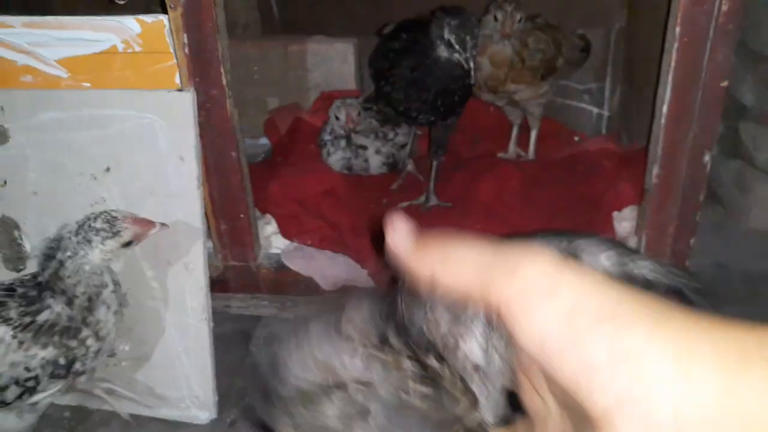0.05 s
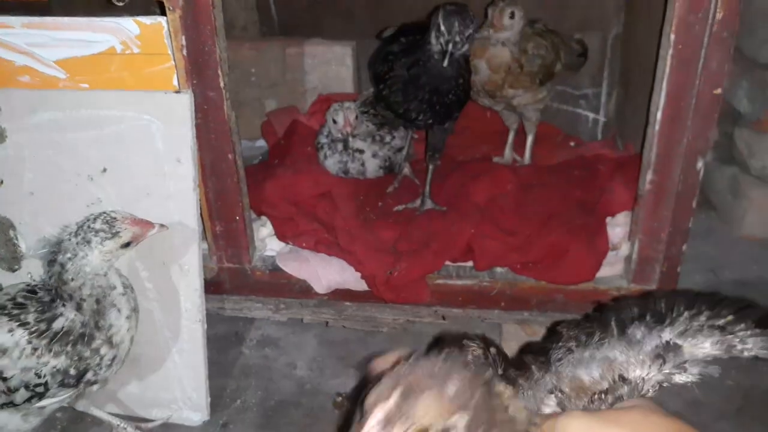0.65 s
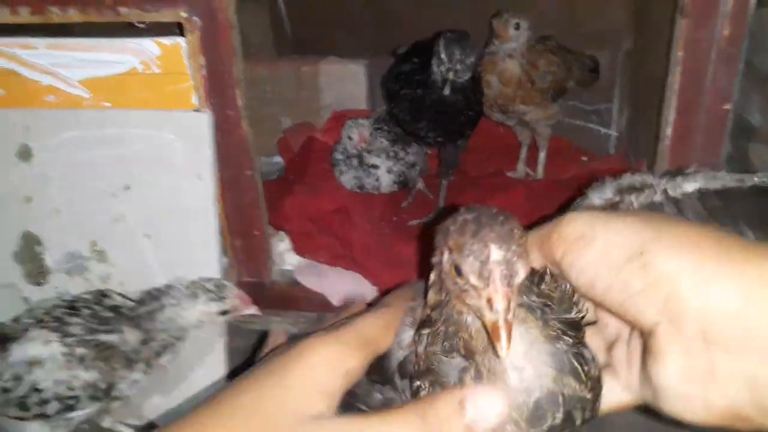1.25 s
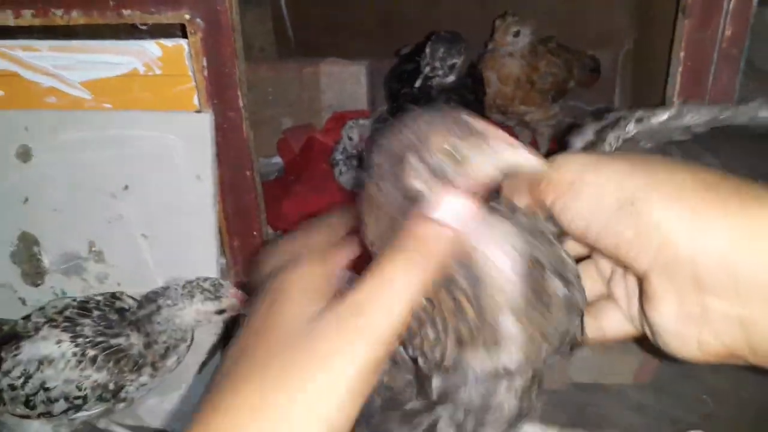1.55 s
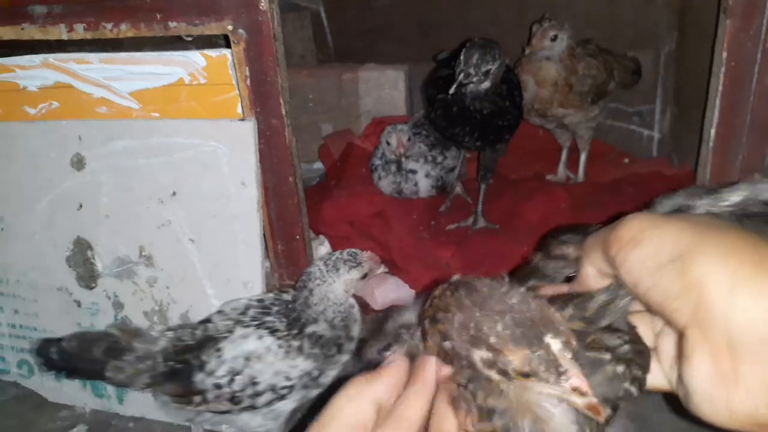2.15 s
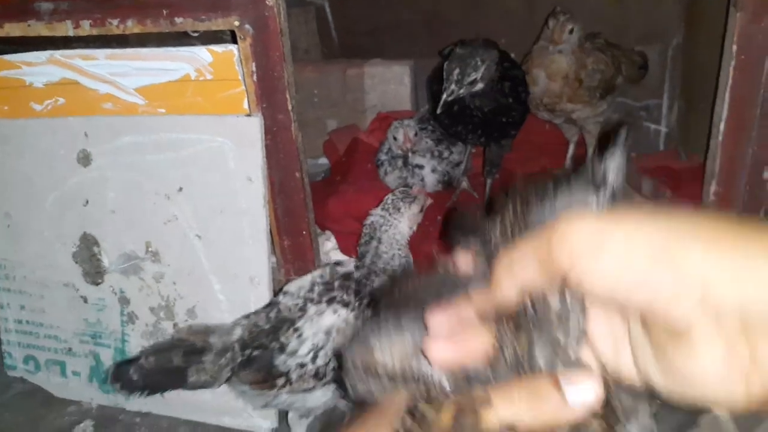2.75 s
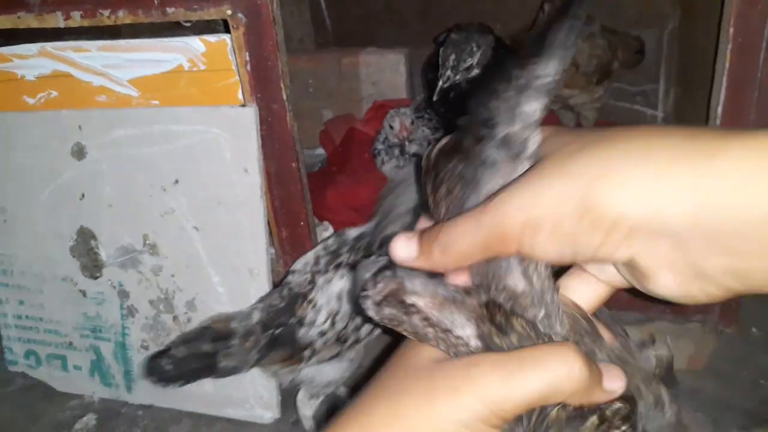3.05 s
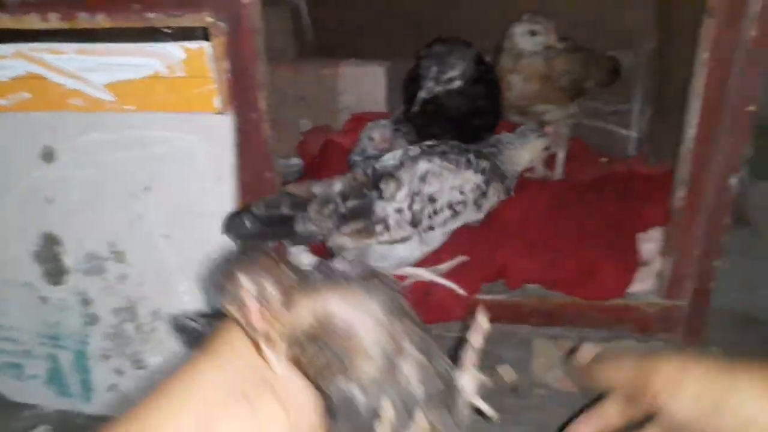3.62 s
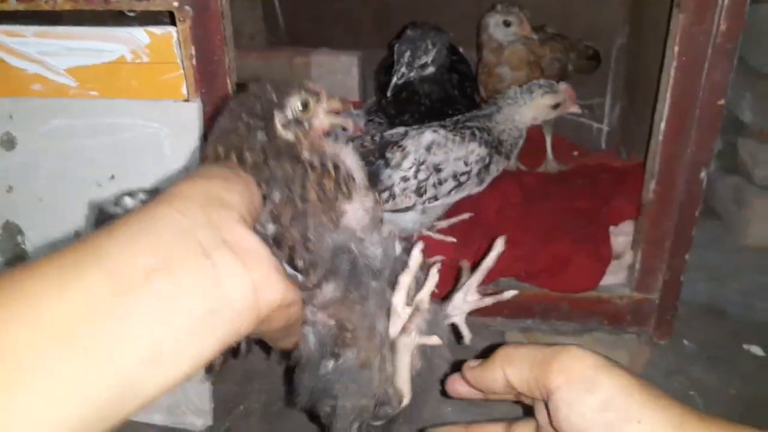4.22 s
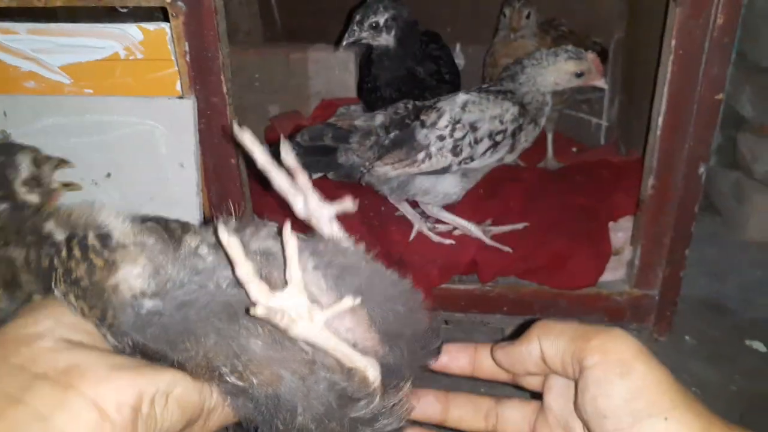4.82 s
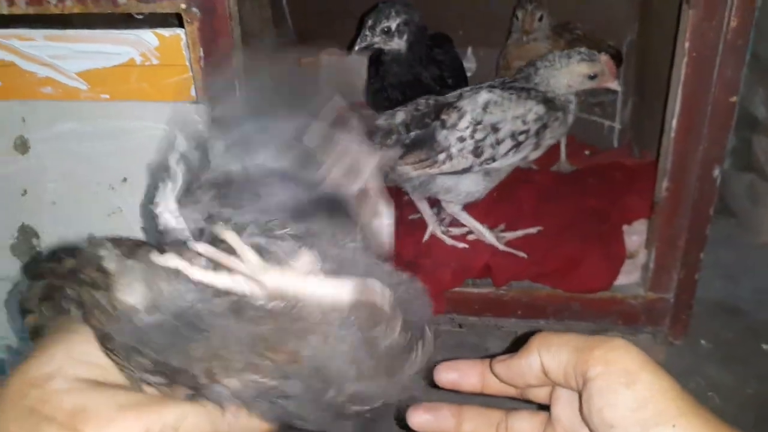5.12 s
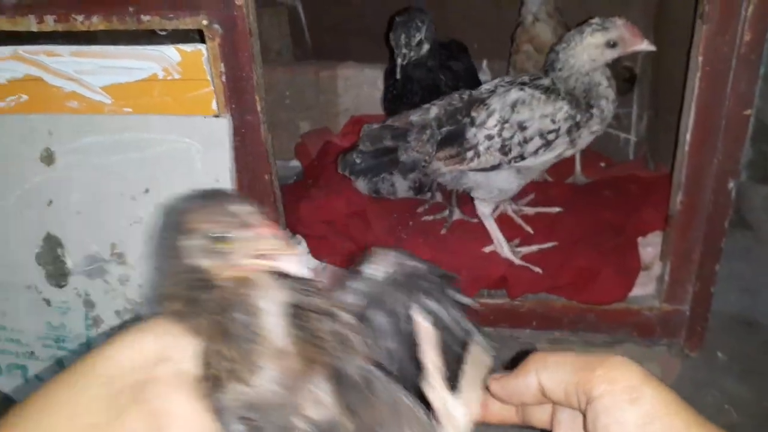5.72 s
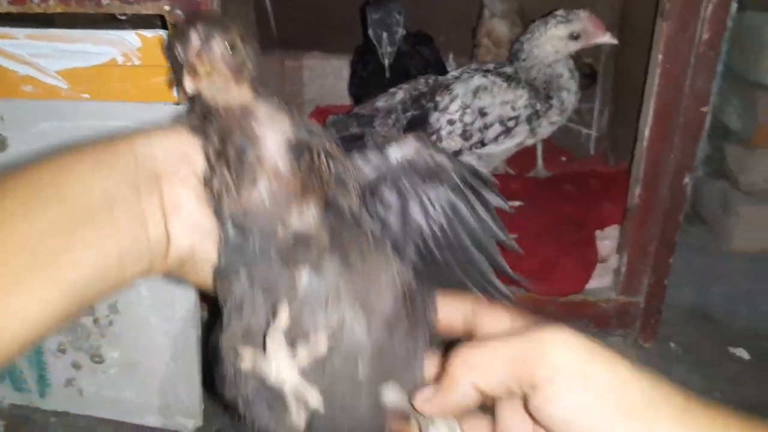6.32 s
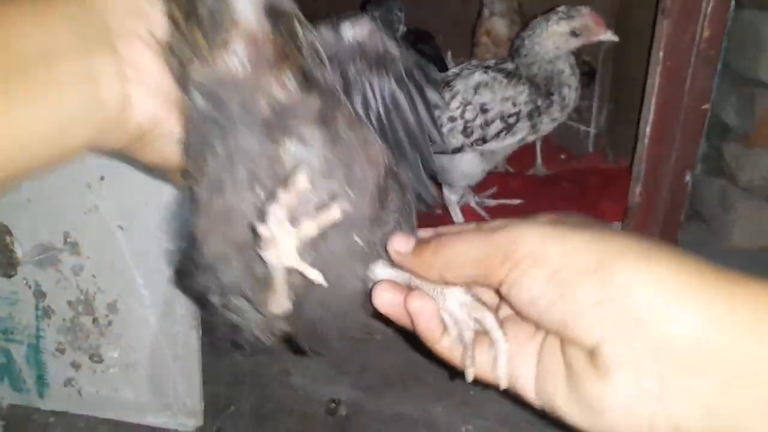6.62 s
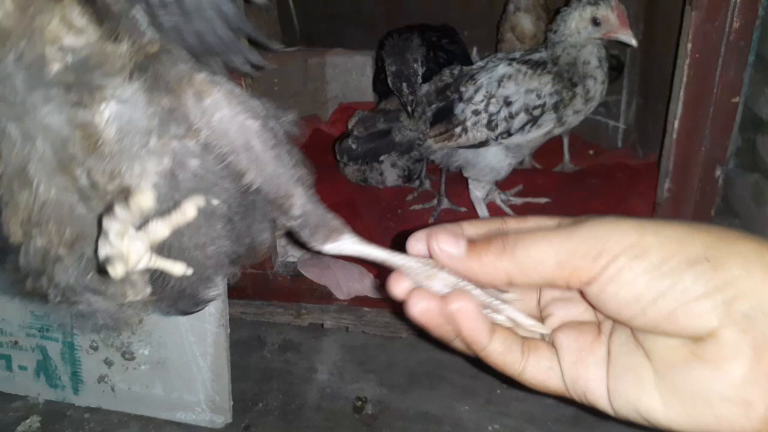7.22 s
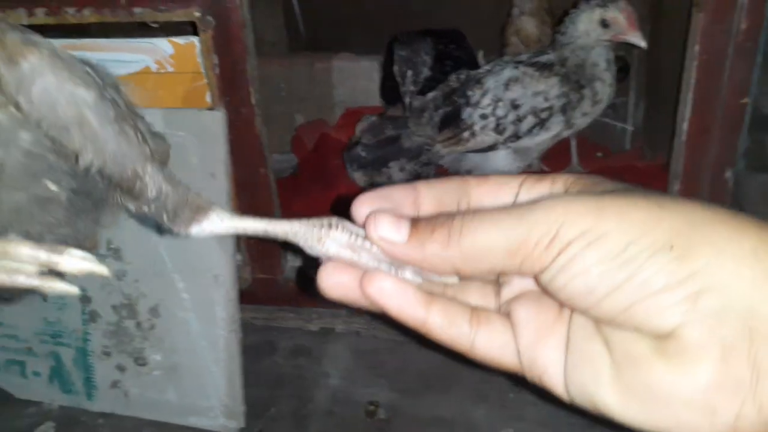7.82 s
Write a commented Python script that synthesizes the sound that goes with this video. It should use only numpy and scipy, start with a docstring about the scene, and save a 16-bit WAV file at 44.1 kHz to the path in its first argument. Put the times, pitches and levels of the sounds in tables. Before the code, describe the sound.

A young chicken gives shrill, falling distress peeps again and again up close, over low thumps, wing flaps and rubbing.

```python
"""Shrill distress peeps from a young chicken, held in the hands in front of a small coop. Each peep is a
whistle of the syrinx that arches up, plunges and often breaks into a short rasp as the membrane slackens. Early
on come faint cheeps, two trills and one trembling squeal. The bird's struggling buffets and rubs the left
microphone port, and claws tick on the left too. A few low yelps come from farther off, over a faint hiss."""
import sys
import numpy as np
from scipy import signal
from scipy.fft import rfft, irfft
from scipy.io import wavfile
from scipy.ndimage import uniform_filter1d, map_coordinates

SR = 44100
rng = np.random.default_rng(int(sys.argv[2]) if len(sys.argv) > 2 else 0)


def wav_out(sig):
    """Save sig, one row per channel (or a flat mono array), as 16-bit PCM at SR to the path in sys.argv[1]."""
    wavfile.write(sys.argv[1], SR, np.round(np.clip(np.atleast_2d(sig).T, -1, 1) * 32767).astype(np.int16))


N = 351036
TIME = np.arange(N) / SR

# Levels in the tables are relative: each layer has its own gain on top.
# Peeps: (start [s], rise [s], sag [s], plunge [s], plunge bend [exponent], start pitch [Hz],
# crest pitch [Hz], end pitch [Hz], opening [dB], crest [dB], knee [dB], throat ring [Hz], ring [dB],
# left over right [dB], right delay [ms], overtones [dB], second voice [dB])
PEEP_CALLS = [ (0.0, .004, 0.0089, 0.023, 1.2, 3160, 3276, 940, -23, -41.5, -34, 1680, 15.8, -3, .37, -4, -30),
              (0.247, 0.14, 0.0092, .037, 1.01, 3990, 4183, 1170, -57, -50, -45, 2030, 23.3, -4, .22, -15, -10.5),
              (2.305, .13, .1, 0.041, 1.24, 3460, 4557, 1750, -58.5, -61.5, -41.5, 1740, 11.6, -5, -0.23, 10, -11.5),
              (2.888, .004, 0.012, 0.016, 1.28, 3460, 3400, 1124, -46, -50.5, -36, 1841, 25.3, -5.5, -.02, -7, -30),
              (3.066, .12, 0.052, .042, 1.16, 4020, 4460, 1498, -61, -55, -39, 1880, 23.3, -7, -0.26, -1, -11),
              (3.453, 0.11, .069, 0.045, 0.64, 3500, 4713, 1397, -48.5, -45, -23.5, 3021, 8, 4.5, -.05, 4.5, -24),
              (4.069, 0.18, 0.065, 0.044, 1.2, 4060, 4440, 907, -59.5, -63, -38, 2320, 2.4, 7, 0.18, -3.5, -11.5),
              (4.656, .15, 0.076, .054, 0.79, 3550, 4700, 1103, -40.5, -52, -30.5, 2090, 12.5, 2, 0.3, -9.5, -19.5),
              (5.158, 0.12, 0.043, .057, 0.98, 4027, 4680, 2037, -46.5, -38.5, -31.5, 3070, 8.8, .5, -0.021, -14.5, -17.5),
              (5.755, 0.17, 0.08, 0.049, 1.29, 3786, 4409, 905, -52, -50, -33.5, 2546, 6.3, 4, -0.066, 0, -15),
              (6.377, 0.13, 0.098, 0.045, 1.34, 3610, 4368, 898, -48.5, -53, -35, 2570, 14.3, 7, -0.046, 0, -10),
              (7.107, 0.14, .097, 0.041, 1.22, 3680, 4280, 946, -43, -47.5, -33, 2540, 10.2, 0.5, .34, -13, -8),
              ]
# Harmonics of the syrinx: (harmonic [number], level [dB])
SYRINX_HARMONICS = [(1, 0), (2, -19.5), (3, -24.5), (4, -31.5)]
# Filtering by the beak: (frequency [Hz], gain [dB])
BEAK_RESPONSE = [(2000, 0), (3900, 2.5), (4700, -10), (5600, -30), (7000, -28), (9000, -13.5),
                 (11200, -4.5), (14000, -8), (16000, -10)]
# Breath through the open beak: (frequency [Hz], level [dB])
PEEP_BREATH = [(2300, -3.5), (4200, -2), (5500, -16.5), (8000, -19.5), (11000, -1), (14500, -5.5)]
# Voice breaks: (start [s], length [s], pitch [Hz], level [dB], jitter [share of pitch])
RASP_CALLS = [(0.011, 0.045, 566.7, -40, 0.13), (0.415, 0.013, 555.6, -42, 0.052),
              (2.89, 0.015, 606, -32, 0.11), (3.276, 0.025, 955, -45, 0.16),
              (3.648, 0.064, 563.3, -38, 0.12), (4.341, 0.033, 510, -41, 0.037),
              (4.903, 0.05, 585.4, -43.5, 0.0907), (6.039, 0.027, 515.5, -36.5, 0.072),
              (6.64, 0.034, 512, -39, 0.034), (7.372, 0.025, 513, -38.5, 0.06)]
# Throat resonances: (centre [Hz], width [Hz], gain [dB])
THROAT_FORMANTS = [(1220, 190, -4.5), (1650, 1400, -2.5), (2328, 120, 16), (3500, 500, -6.5)]
# Air leaking in a rasp: (frequency [Hz], level [dB])
RASP_BREATH = [(900, -17), (1600, -3.5), (2500, 0.5), (3800, -1.5), (4600, -13.5), (6000, -31),
               (8000, -44.5), (11000, -29), (14000, -31)]
# Course of the squeal: (time [s], pitch [Hz], level [dB])
SQUEAL_CONTOUR = [(2.611, 1834, -59), (2.645, 1800, -50), (2.656, 1803, -45), (2.695, 1821, -40),
                  (2.714, 1851, -42), (2.801, 1855, -36.5), (2.882, 1816, -35), (2.896, 1770, -48)]
# Timbre of the squeal: (harmonic [number], level [dB])
SQUEAL_HARMONICS = [(1, -6), (2, -0.5), (3, -34.5), (4, -22.5), (5, -39), (6, -12.5), (7, -32), (8, -29.5)]
# Two trills, a list each: (time [s], pitch [Hz], level [dB])
TRILL_CONTOURS = [
    [(1.695, 2400, -64.5), (1.715, 3970, -79), (1.743, 4020, -67), (1.79, 3790, -61.5), (1.798, 3300, -55),
     (1.81, 3710, -54), (1.823, 2920, -51.5), (1.832, 3155, -54), (1.845, 2117, -66)],
    [(1.917, 2040, -49.5), (1.928, 3610, -57), (1.942, 3260, -49.5), (1.954, 3750, -52.5),
     (1.968, 2910, -48.5), (2.0, 4470, -58), (2.008, 3566, -38), (2.033, 3790, -44), (2.055, 4060, -60),
     (2.09, 3615, -63), (2.11, 2530, -70)],
]
# Faint cheeps: (start [s], length [s], start pitch [Hz], middle pitch [Hz], end pitch [Hz], level [dB],
# left over right [dB])
CHEEP_CALLS = [(1.207, 0.045, 3430, 3400, 3460, -82, 14), (1.327, .045, 3880, 3680, 3810, -82.5, 13),
               (1.505, 0.053, 3190, 3190, 2650, -75.5, -10), (1.513, 0.076, 3770, 3900, 3500, -78.5, 6.5),
               (1.608, 0.033, 2590, 2883, 2380, -59.5, -9.5)]
# Jerks of the bird in the hands: (start [s], length [s], buffeting [dB], rubbing [dB])
BIRD_JERKS = [ (0.0, 0.1754, -38, -59), (0.619, 0.032, -44.5, -75), (0.773, .11, -35.5, -61.5),
              (1.188, .14, -41.5, -45), (1.753, 0.079, -44, -47.5), (1.813, .07, -38, -61),
              (1.957, 0.034, -42.5, -68.5), (2.757, .11, -45, -68.5), (3.111, 0.024, -49.5, -56.5),
              (3.22, 0.12, -45, -61), (3.447, 0.13, -31.5, -47), (3.52, 0.15, -30.5, -45.5),
              (3.841, .13, -47, -60.5), (4.106, .04, -46, -64), (4.232, 0.057, -48, -51),
              (4.321, 0.036, -37.5, -63), (4.471, .11, -31.5, -42.5), (4.634, 0.058, -35.5, -51.5),
              (4.825, 0.16, -47.5, -74), (5.257, 0.11, -48, -67), (5.808, 0.047, -43.5, -55),
              (6.122, 0.063, -39, -48.5), (6.413, 0.034, -42.5, -50), (6.5, 0.33, -46, -59.5),
              (6.836, .09, -37, -45), (7.032, .08, -51.5, -67.5), (7.322, 0.055, -35, -58),
              (7.396, 0.014, -29.5, -44), (7.534, 0.063, -47.5, -57.5), (7.764, .02, -56, -60.5), ]
# Restless rumble under the jerks: (time [s], level [dB])
UNREST_LEVEL = [(0.0, -40.5), (0.31, -50.5), (1.66, -56.5), (1.88, -48.5), (2.15, -58), (2.7, -50),
                (3.1, -62.5), (3.55, -47), (4.57, -46), (5.43, -58.5), (6.74, -49.5), (7.96, -57.5)]
# Wing draught on the port: (frequency [Hz], level [dB])
BUFFET_SPECTRUM = [(28, -13), (38, -4), (52, 0), (80, -7.5), (120, -17.5), (200, -37)]
# Rubbing on the port: (frequency [Hz], level [dB])
RUB_SPECTRUM = [(70, -11.5), (130, 9), (250, -2), (400, -16.5), (700, -35.5), (1500, -52), (4000, -53)]
# Bumps and puffs of air on the port: (start [s], level [dB], pitch [Hz], time to peak [s])
PORT_THUMPS = [(0.78, -7.5, 62.6, 0.014), (0.78, -14.5, 143, 0.0059), (1.958, -23, 49.7, 0.025),
               (2.851, -30, 42.6, 0.021), (3.836, -18, 39.2, 0.029), (4.11, -21.5, 42.5, 0.014),
               (4.484, -5, 56.7, 0.0092), (4.523, -13.5, 53.6, 0.011), (4.635, -19.5, 85.4, 0.0083),
               (6.121, -24, 96.6, 0.012), (6.421, -17.5, 40.6, 0.012), (6.84, -30, 62.3, 0.011),
               (7.041, -19.5, 43.8, 0.034), (7.354, -18.5, 47, 0.0096)]
# Scuffs of feathers and fingers: (time [s], level [dB])
FEATHER_SCUFFS = [(0.584, -57), (0.78, -38), (0.819, -38.5), (1.193, -42.5), (1.216, -47), (4.491, -37),
                  (4.51, -30), (4.532, -37.5), (4.608, -47.5), (5.822, -54.5), (6.122, -40.5),
                  (7.568, -44.5)]
# Ticks of claws and quills: (time [s], level [dB])
CLAW_TICKS = [(4.467, -57.5), (4.5313, -55.5), (4.5622, -54), (4.5833, -56.5)]
# Colour of a tick: (frequency [Hz], level [dB])
TICK_SPECTRUM = [(900, 14.5), (2500, -4), (4200, -3), (6000, -16.5), (8500, -25), (12000, -9), (15000, -9)]
# Far yelps: (start [s], length [s], start pitch [Hz], end pitch [Hz], level [dB], jitter [share of pitch])
YELP_CALLS = [(0.257, 0.13, 602, 580, -61.5, 0.14), (3.921, 0.057, 507, 370, -62, 0.054),
              (4.047, 0.078, 685, 456, -56.5, 0.022)]
# Mouth resonances of a yelp: (centre [Hz], width [Hz], gain [dB])
YELP_FORMANTS = [(566, 118, -3), (949, 320, -6.5), (1454, 90, -25.5)]
# Breath in a yelp: (frequency [Hz], level [dB])
YELP_BREATH = [(420, -9.5), (600, -3.5), (800, -13), (1100, -5.5), (1400, -9.5), (1800, -25.5)]
# Colour of the reverb tail: (frequency [Hz], level [dB])
TAIL_SPECTRUM = [(400, 5), (1000, -8.5), (2300, -4), (3800, -4), (4700, 3), (6000, -4), (11000, -1),
                 (15000, -5.5)]
# Background hiss: (frequency [Hz], level [dB])
HISS_SPECTRUM = [(180, -24.5), (300, -5.5), (610, -18), (1090, -21), (3400, -27), (4070, -28.5),
                 (6460, -35), (8280, -39), (11900, -25), (14800, -24.5), (15500, -30.5)]


def peeps(jitter=.004, plunge_jitter=.009, waver=.003, flutter_db=1.87, swell_db=.5, tense_hz=3400,
          second_ratio=1.06, second_lag_s=.012, second_from_hz=3800, air_db=-34.5, mellow_db=4.5):
    """Whistles that split in two at the top, then turn unsteady and mellow as the membrane slackens."""
    out = np.zeros((2, N))
    for *shape, pan_db, delay_ms, overtones_db, second_db in PEEP_CALLS:
        t, hz, level_db = peep_contour(*shape)
        n = len(t)
        hz = hz * (1 + waver * drift(60, n))
        slack = np.clip(2 * (1 - hz / tense_hz), 0, 1)
        unsteady_hz = hz * (1 + jitter * drift(250, n) + plunge_jitter * slack * drift(1200, n))
        tone = whistle(unsteady_hz, overtones_db - mellow_db * slack)
        # under high tension the other side of the syrinx joins, sharp and late, with a faint sub-octave
        joined = np.clip((hz - second_from_hz) / 450, 0, 1)
        second_hz = second_ratio * uniform_filter1d(np.interp(t - second_lag_s, t, hz), size=1200)
        second_voice = whistle(second_hz * (1 + jitter * drift(380, n)), overtones_db)
        sub_octave = from_db(-28) * np.sin(phase_of(second_hz / 2))
        tone += joined * from_db(second_db) * (second_voice + sub_octave)
        tone += from_db(air_db + overtones_db / 2 - mellow_db * slack) * noise(PEEP_BREATH, n)
        loudness = from_db(level_db + flutter_db * drift(150, n) + swell_db * joined * drift(49, n))
        add(out, t, pan(np.sqrt(2) * tone * loudness * gate(t, .0069), pan_db, delay_ms))
    return out


def peep_contour(start, rise_s, sag_s, plunge_s, bend, start_hz, crest_hz, end_hz,
                 opening_db, crest_db, knee_db, ring_hz, ring_db):
    """Times, pitch and level of a peep: thin crest, louder sag, a plunge through the throat's ring."""
    t = span(start, start + rise_s + sag_s + plunge_s)
    rise = ramp(t, start, rise_s)
    sag = ease(ramp(t, start + rise_s, sag_s) ** 1.2)
    plunge = ramp(t, start + rise_s + sag_s, plunge_s) ** bend
    knee_hz = min(3747, crest_hz)   # where the sag tips into the plunge
    hz = crest_hz + (start_hz - crest_hz) * (1 - rise) ** 2
    hz += (knee_hz - crest_hz) * sag + (end_hz - knee_hz) * plunge
    above_crack_hz = hz - 4190   # here the voice cracks between two registers
    hz += 76 * np.tanh(above_crack_hz / 30) * np.exp(-np.abs(above_crack_hz) / 330)
    attack, settle = ramp(rise, 0, .23), ease(ramp(rise, .23, .76))
    db = opening_db - 19 * (1 - attack) + (crest_db - opening_db) * settle
    db += (knee_db - crest_db) * sag - 12.5 * plunge   # the breath gives out in the plunge
    db += ring_db * np.exp(-((hz - ring_hz) / 480) ** 2)
    return t, hz, db


def whistle(hz, overtones_db, hoarse_rad=.7):
    """One side of the syrinx: a near sine whose hoarse overtones stand out above the beak's pass band."""
    phase = phase_of(hz)
    tone = np.sin(phase)
    for k, (_, db) in enumerate(SYRINX_HARMONICS[1:], 2):
        beak_db = db_at(BEAK_RESPONSE, k * hz) - db_at(BEAK_RESPONSE, hz)
        gain = from_db(db + overtones_db + beak_db) * (k * hz < SR / 2)
        tone += gain * np.sin(k * phase + hoarse_rad * drift(700, len(hz)))
    return tone


def rasps(shimmer_db=.5, air_db=-14.5):
    """At the foot of a peep the slack membrane flaps at a low, uneven rate and leaks air."""
    out = np.zeros(N)
    for start, length, hz, db, jitter in RASP_CALLS:
        t = span(start, start + length)
        flap_hz = hz * (1 + jitter * drift(700, len(t)))
        voice = buzz(flap_hz, THROAT_FORMANTS, harmonics=7, response_samples=110)
        voice += from_db(air_db) * noise(RASP_BREATH, len(t))
        voice *= from_db(shimmer_db * drift(600, len(t)))
        add(out, t, from_db(db) * unit_rms(voice) * gate(t, .0076))
    return pan(out, -15, delay_ms=.25)


def buzz(hz, formants, harmonics, response_samples):
    """A buzzing membrane heard through resonances that take a moment to answer."""
    phase, out = phase_of(hz), 0
    for k in range(1, harmonics + 1):
        gain = sum(from_db(db) / (1 + (2 * (k * hz - centre) / width) ** 2)
                   for centre, width, db in formants)
        out += uniform_filter1d(gain, size=response_samples) * np.sin(k * phase)
    return unit_rms(out)


def squeal(gain_db=2.5, tremble=.013, tremble_hz=44, wander=.005, jitter=.0043, shimmer_db=4.5):
    """The voice holds an octave down, trembling, second harmonic strongest, brighter when pushed."""
    out = np.zeros(N)
    times, pitches, levels = np.transpose(SQUEAL_CONTOUR)
    t = span(times[0], times[-1])
    n = len(t)
    waver = tremble * np.sin(phase_of(tremble_hz * (1 + .05 * drift(30.6, n))))
    waver += jitter * drift(500, n) + wander * drift(24.97, n)
    phase = phase_of(np.interp(t, times, pitches) * (1 + waver))
    effort_db = np.interp(t, times, levels)
    edge_db = .12 * (effort_db - effort_db.max())
    tone = sum(from_db(db + edge_db * (k != 2) + shimmer_db * drift(69, n)) * np.sin(k * phase)
               for k, (_, db) in enumerate(SQUEAL_HARMONICS, 1))
    add(out, t, unit_rms(tone) * from_db(effort_db + gain_db) * gate(t, .006))
    return pan(out, -2, delay_ms=.067)


def trills():
    """The whistle flicks up and down as the bird works itself up."""
    out = np.zeros(N)
    for contour in TRILL_CONTOURS:
        times, pitches, levels = np.transpose(contour)
        t = span(times[0] - .002, times[-1] + .002)
        hz = uniform_filter1d(np.interp(t, times, pitches), size=150)
        add(out, t, soft_call(t, hz, np.interp(t, times, levels)))
    return pan(out, -2)


def cheeps(swell_db=3):
    """Short whistles on a shallow arc, fullest in the middle."""
    out = np.zeros((2, N))
    for start, length, start_hz, middle_hz, end_hz, db, pan_db in CHEEP_CALLS:
        t = span(start, start + length)
        progress = ramp(t, start, length)
        arc = np.sin(np.pi * progress)
        hz = start_hz + (end_hz - start_hz) * progress + (middle_hz - (start_hz + end_hz) / 2) * arc
        add(out, t, pan(soft_call(t, hz, db - swell_db * (1 - arc)), pan_db))
    return out


def soft_call(t, hz, db, jitter=.006, flutter_db=2.5):
    """A quiet, slightly unsteady whistle in one voice."""
    tone = whistle(hz * (1 + jitter * drift(250, len(t))), overtones_db=-4.5)
    return np.sqrt(2) * tone * from_db(db + flutter_db * drift(153.6, len(t))) * gate(t, .0042)


def handling(buffet_db=6.5, rub_db=7.5, lumpy_db=3):
    """Wing draughts, lumpy rubbing, bumps and scuffs right at the port."""
    draught, rub = struggle()
    buffeting = draught * from_db(buffet_db) * noise(BUFFET_SPECTRUM)
    friction = unit_rms(noise(RUB_SPECTRUM) * from_db(lumpy_db * drift(110)))
    return buffeting + rub * from_db(rub_db) * friction + thumps() + scuffs(rub)


def struggle(attack_s=.014, sag_db=3, buffet_release_s=.037, rub_release_s=.025):
    """Envelopes of draught and rubbing: each jerk builds, sags and dies away over a restless bed."""
    unrest = from_db(np.interp(TIME, *np.transpose(UNREST_LEVEL)))
    power = np.array([unrest, from_db(-17) * unrest]) ** 2
    for start, length, buffet_db, rub_db in BIRD_JERKS:
        t = span(start - attack_s, start + length + .3)
        held = ease(ramp(t, start - attack_s, attack_s)) * from_db(-sag_db * ramp(t, start, length))
        since_end = np.maximum(t - start - length, 0)
        release = np.exp(-since_end / np.array([[buffet_release_s], [rub_release_s]]))
        add(power, t, (from_db([[buffet_db], [rub_db]]) * held * release) ** 2)
    return np.sqrt(power)


def thumps(wobble=.18):
    """Bumps and puffs of air hit the port as short swells of wobbling bass."""
    out = np.zeros(N)
    for start, db, hz, rise_s in PORT_THUMPS:
        t = span(start, start + .25)
        age = (t - t[0]) / rise_s
        swell = (age * np.exp(1 - age)) ** 1.91
        add(out, t, from_db(db) * swell * np.sin(phase_of(hz * (1 + wobble * drift(69, len(t))))))
    return out


def scuffs(rub, catches_per_s=60, catch_db=6, scuff_db=10.5):
    """Feathers and fingers catch and slip; each click comes through the casing as a dull knock."""
    catches = rng.random(N) < catches_per_s / SR
    clicks = catches * rng.standard_normal(N) * rub * from_db(catch_db)
    for start, db in FEATHER_SCUFFS:
        clicks[int(start * SR)] += from_db(db + scuff_db)
    casing = np.vstack([butter(2, [120, 300], "band"), butter(3, 620, "low")])
    knock_peak = np.abs(signal.sosfilt(casing, signal.unit_impulse(SR // 20))).max()
    return signal.sosfilt(casing, clicks + 1e-18) / knock_peak


def ticks(gain_db=-4.5, decay_s=.009):
    """Claws and quills snap past the fingers on the left."""
    out = np.zeros(N)
    for start, db in CLAW_TICKS:
        t = span(start, start + .04)
        add(out, t, from_db(db + gain_db) * noise(TICK_SPECTRUM, len(t)) * np.exp((t[0] - t) / decay_s))
    return pan(out, 19.5)


def yelps(air_db=-10):
    """Short hoarse calls of buzz and breath whose pitch sags."""
    out = np.zeros(N)
    for start, length, start_hz, end_hz, db, jitter in YELP_CALLS:
        t = span(start, start + length)
        hz = end_hz + (start_hz - end_hz) * (1 - (t - start) / length) ** 2
        hz *= 1 + jitter * drift(600, len(t))
        voice = buzz(hz, YELP_FORMANTS, harmonics=3, response_samples=8)
        voice += from_db(air_db) * noise(YELP_BREATH, len(t))
        add(out, t, from_db(db) * voice * gate(t, .0083))
    return pan(out, -18.5, delay_ms=.07)


def coop_echo(stereo, t60_s, wet_db, early_db, dull_hz=4200, echoes=7):
    """Near echoes off floor and coop and a diffuse tail whose treble dies sooner, each port its own."""
    t, out = span(0, .7), []
    for channel in stereo:
        wash, decay = noise(TAIL_SPECTRUM, len(t)), from_db(-60 * t / t60_s)
        lows = signal.sosfilt(butter(3, dull_hz, "low"), wash[::-1])[::-1]
        lows = signal.sosfilt(butter(3, dull_hz, "low"), lows)
        tail = (lows * decay + (wash - lows) * decay ** 1.6) * gate(t, .014)
        response = from_db(wet_db) * tail / np.linalg.norm(tail)
        arrivals = (rng.uniform(.002, .016, echoes) * SR).astype(int)
        response[arrivals] += from_db(early_db) * rng.choice([-1, 1], echoes)
        out.append(signal.fftconvolve(channel, response)[:N])
    return np.array(out)


def hiss(left_db=-76.5, right_db=-75.2):
    """A faint, steady bed of noise, independent on each side."""
    return np.array([from_db(db) * noise(HISS_SPECTRUM) for db in (left_db, right_db)])


def from_db(db):
    """Decibels to gain."""
    return 10 ** (np.asarray(db) / 20)


def unit_rms(x):
    """Scale to unit power."""
    return x / np.sqrt(np.mean(x ** 2) + 1e-20)


def db_at(spectrum, hz):
    """Read a spectrum on a log-frequency axis."""
    frequencies, db = np.transpose(spectrum)
    return np.interp(np.log(hz + 1), np.log(frequencies), db)


def butter(order, hz, kind):
    """A smooth, flat-topped filter."""
    return signal.butter(order, hz, kind, fs=SR, output="sos")


def noise(spectrum, size=N):
    """Coloured noise of unit power, falling away outside the listed range."""
    hz = np.fft.rfftfreq(size, 1 / SR)
    low_skirt = 1 + (spectrum[0][0] / (hz + 1) / 1.3) ** 6
    high_skirt = 1 + (hz / spectrum[-1][0] / 1.3) ** 6
    colour = from_db(db_at(spectrum, hz)) / low_skirt / high_skirt
    return unit_rms(irfft(rfft(rng.standard_normal(size)) * colour, size))


def drift(rate_hz, size=N):
    """Smooth random modulation with a spread of about 1."""
    steps = np.arange(size) * rate_hz / SR
    return map_coordinates(rng.standard_normal(int(steps[-1]) + 4), [steps + 1], order=2, mode="nearest")


def phase_of(hz):
    """Running phase of a pitch curve."""
    return 2 * np.pi * np.cumsum(hz) / SR


def ramp(t, start, length):
    """Progress from 0 to 1 through a stretch."""
    return np.clip((t - start) / max(length, 1 / SR), 0, 1)


def ease(progress):
    """Round off both ends of a ramp."""
    return np.sin(np.pi / 2 * progress) ** 2


def gate(t, fade_s):
    """Fade in and out."""
    return ease(ramp(np.minimum(t - t[0], t[-1] - t), 0, fade_s))


def span(start, end):
    """Sample times between two moments."""
    return TIME[max(int(start * SR), 0):int(end * SR)]


def add(track, t, sound):
    """Mix a sound in at its time."""
    first = int(round(t[0] * SR))
    track[..., first:first + len(t)] += sound


def pan(x, left_over_right_db, delay_ms=0):
    """Share a sound between the two ports at constant power, delaying the right."""
    left, right = unit_rms(from_db([left_over_right_db / 2, -left_over_right_db / 2]))
    delayed = map_coordinates(x, [np.arange(len(x)) - delay_ms * SR / 1000], order=3)
    return np.array([left * x, right * delayed])


def scene():
    """The bird up close, brighter on the right; handling on the left; yelps mostly as echo; hiss."""
    bird = from_db(-1.5) * peeps() + cheeps() + trills() + squeal() + rasps()
    far = yelps()
    treble = signal.sosfilt(butter(1, 9000, "high"), bird)
    bird += np.array([[-.25], [.5]]) * treble
    bird += coop_echo(bird, t60_s=.24, wet_db=-7.5, early_db=-19)
    far = from_db(3.5) * far + coop_echo(far, t60_s=.27, wet_db=0, early_db=-1.5)
    bed = hiss()
    hands = np.array([handling(), from_db(-26.5) * handling()])
    return bird + hands + ticks() + far + bed


def record(dry, low_cut_hz=29, high_cut_hz=15700):
    """The deepest rumble is rolled off and the top is cut steeply."""
    heard = signal.sosfilt(butter(2, low_cut_hz, "high"), dry)
    return signal.sosfilt(signal.ellip(10, .1, 80, high_cut_hz, fs=SR, output="sos"), heard)


dry = scene()
out = record(dry)
wav_out(out)
```